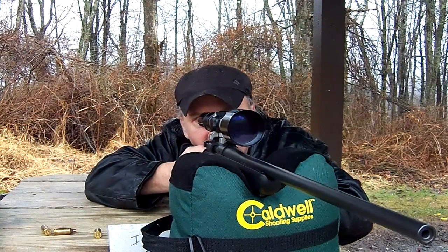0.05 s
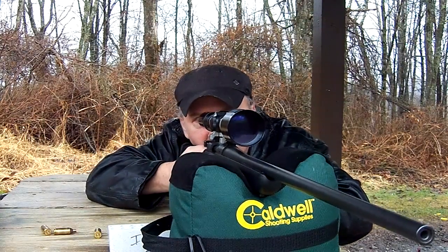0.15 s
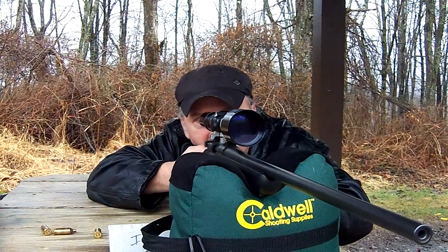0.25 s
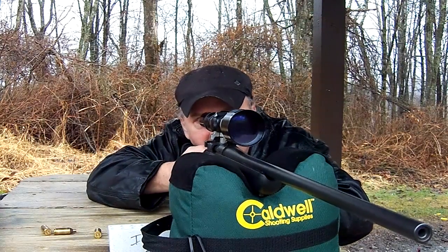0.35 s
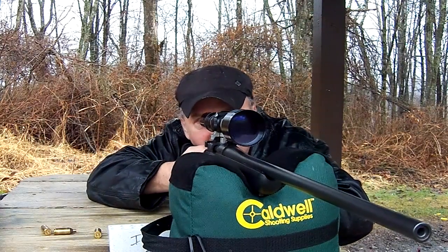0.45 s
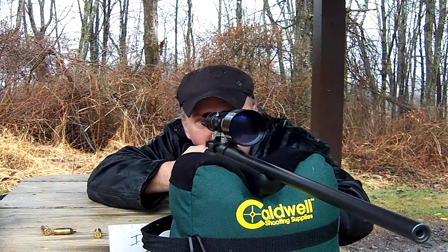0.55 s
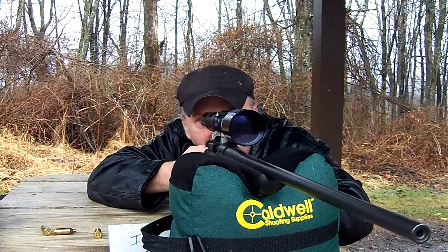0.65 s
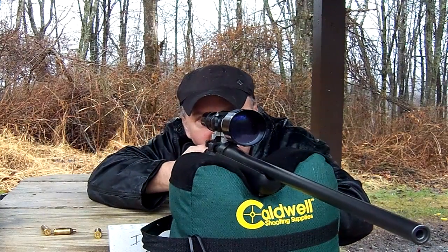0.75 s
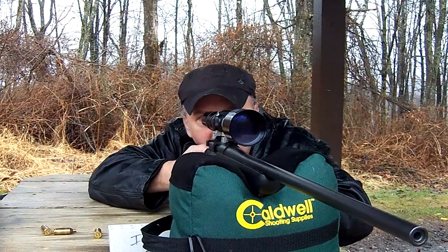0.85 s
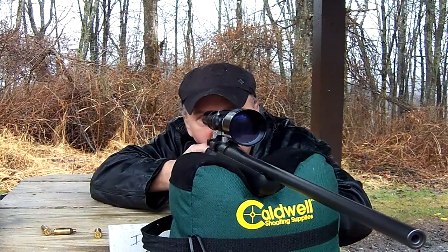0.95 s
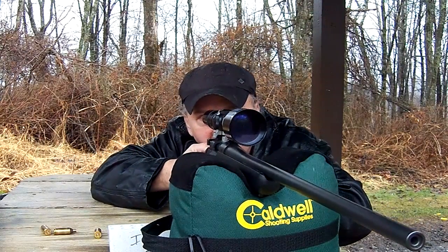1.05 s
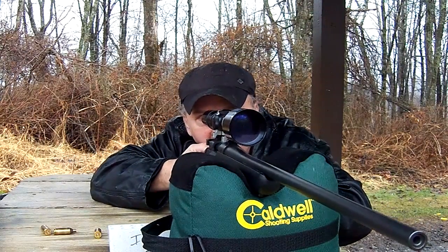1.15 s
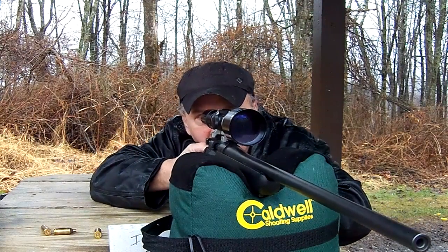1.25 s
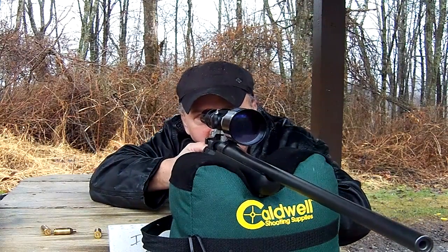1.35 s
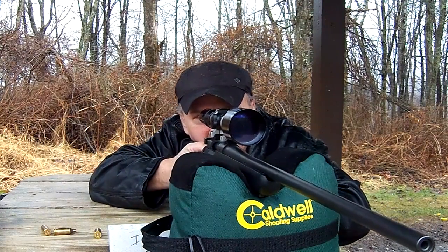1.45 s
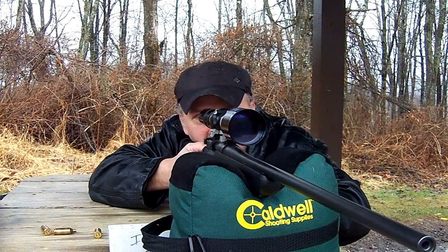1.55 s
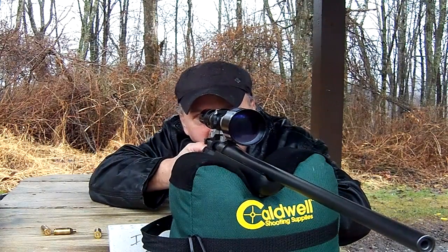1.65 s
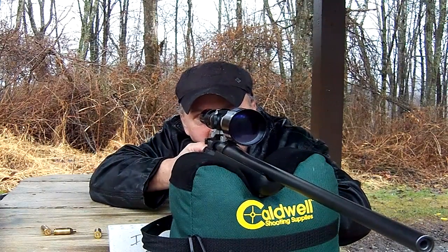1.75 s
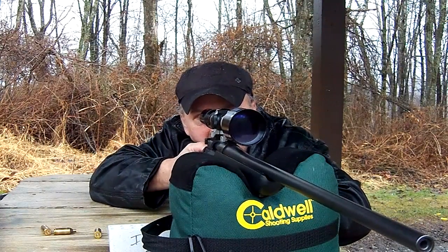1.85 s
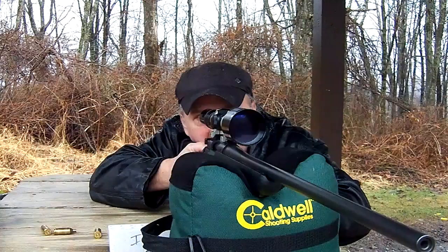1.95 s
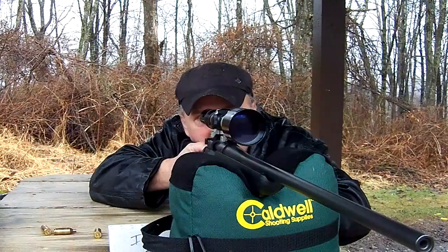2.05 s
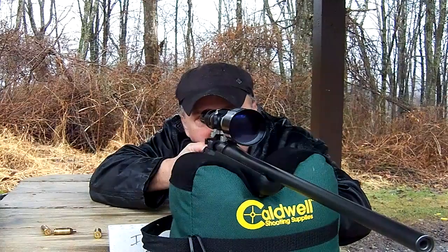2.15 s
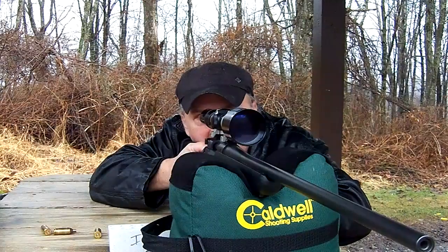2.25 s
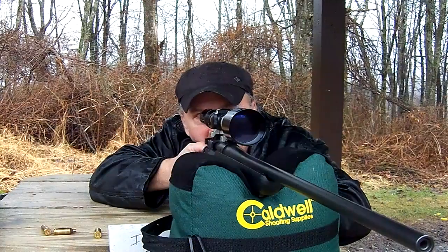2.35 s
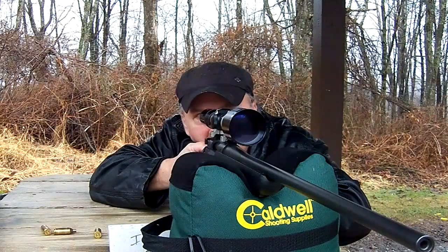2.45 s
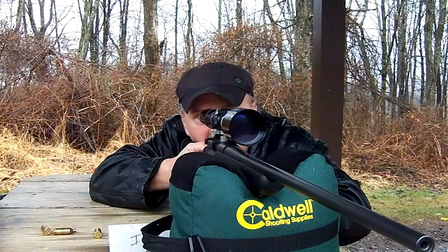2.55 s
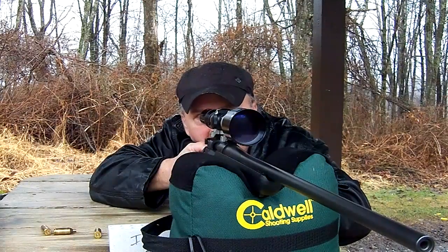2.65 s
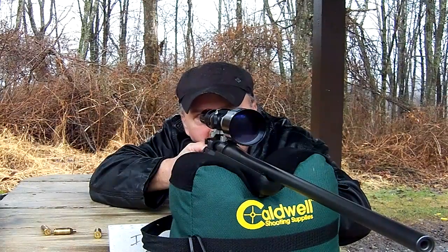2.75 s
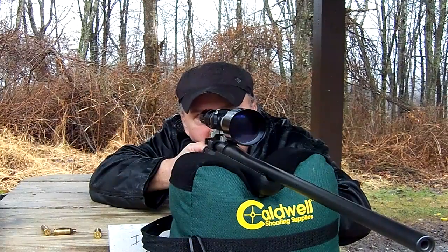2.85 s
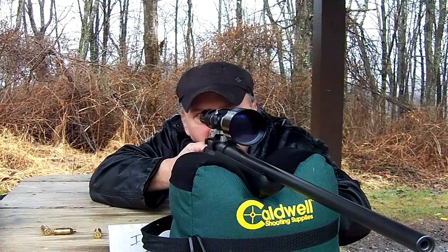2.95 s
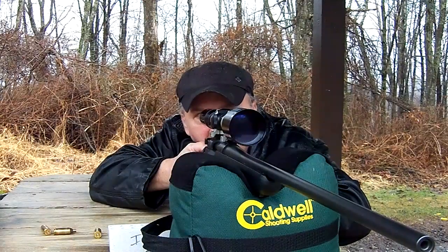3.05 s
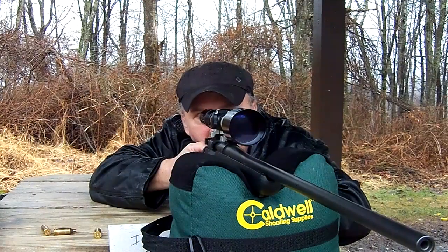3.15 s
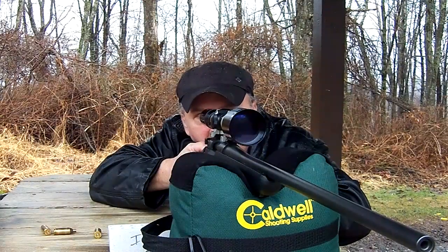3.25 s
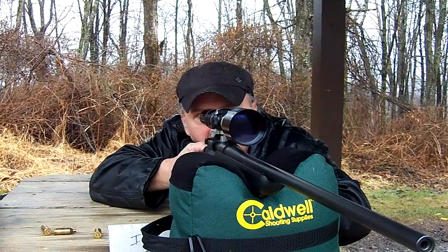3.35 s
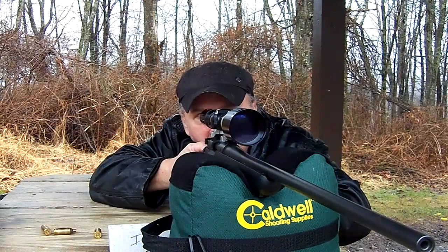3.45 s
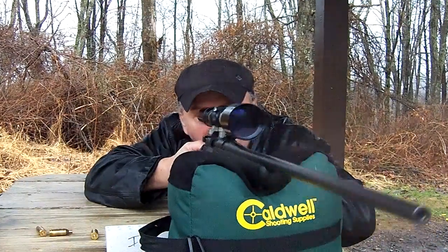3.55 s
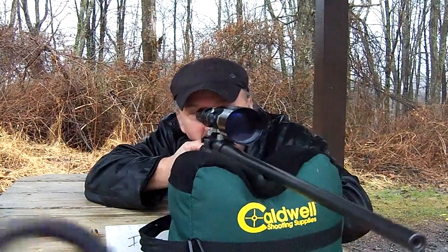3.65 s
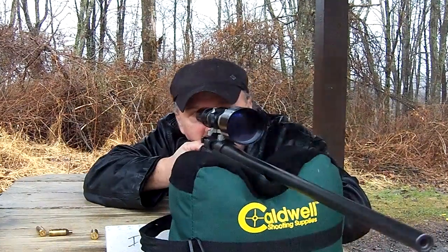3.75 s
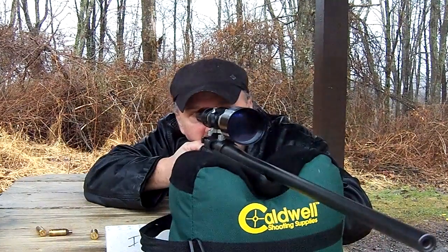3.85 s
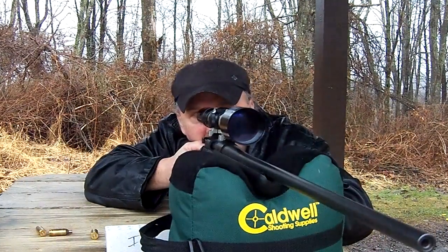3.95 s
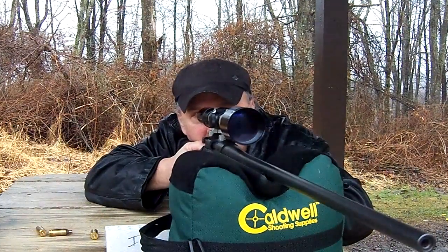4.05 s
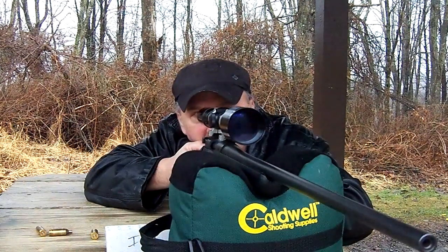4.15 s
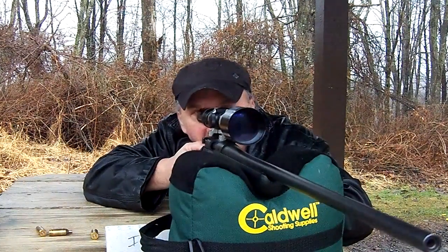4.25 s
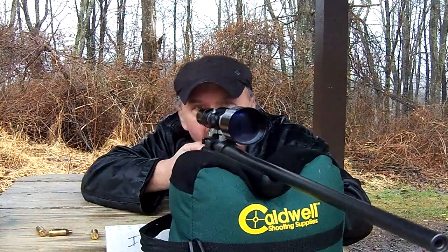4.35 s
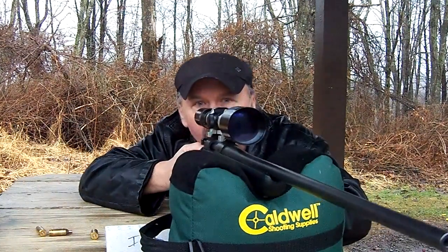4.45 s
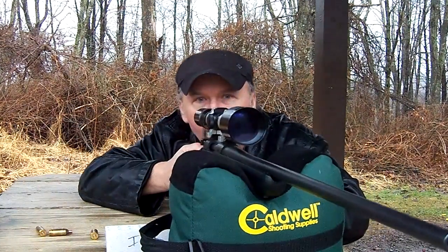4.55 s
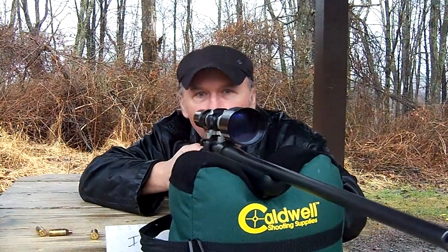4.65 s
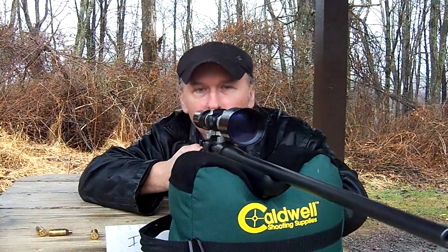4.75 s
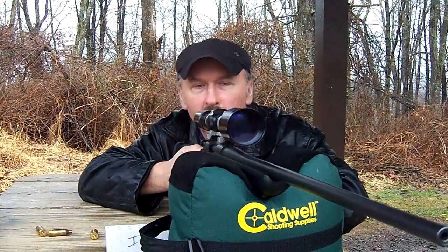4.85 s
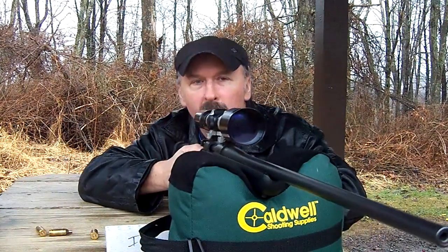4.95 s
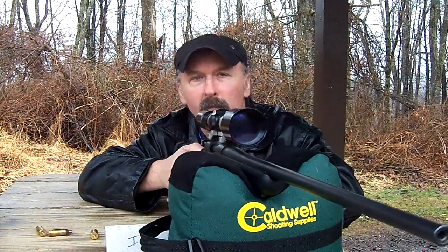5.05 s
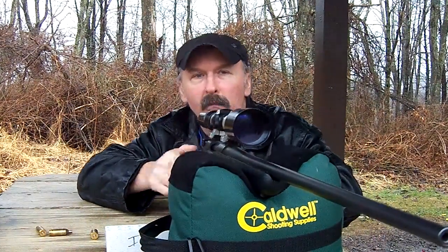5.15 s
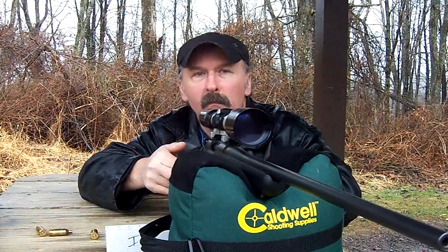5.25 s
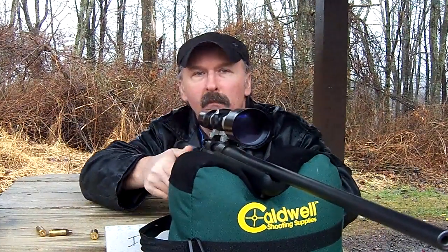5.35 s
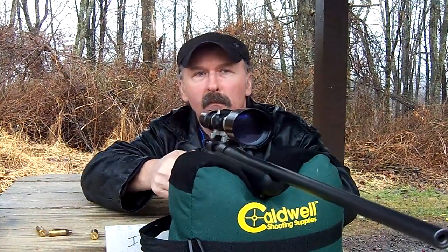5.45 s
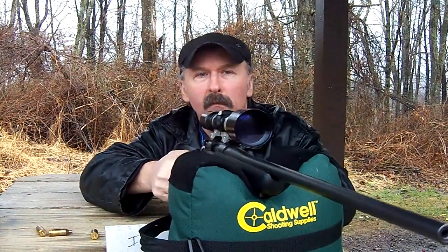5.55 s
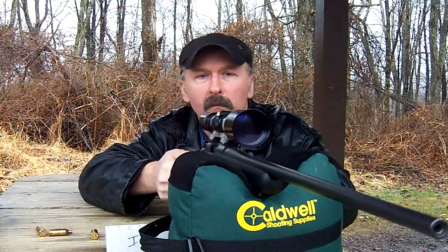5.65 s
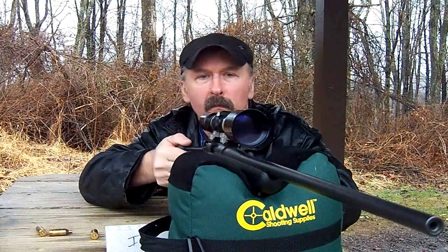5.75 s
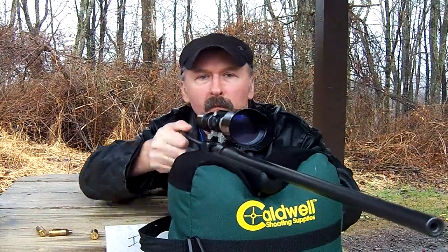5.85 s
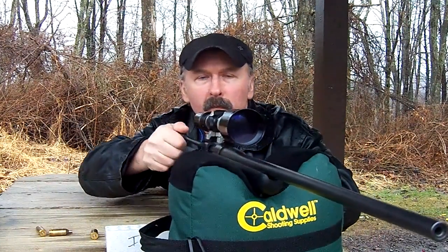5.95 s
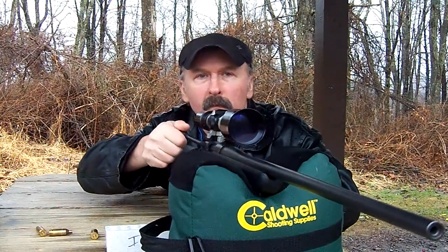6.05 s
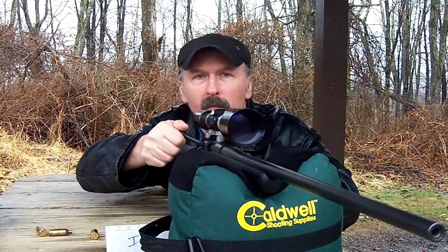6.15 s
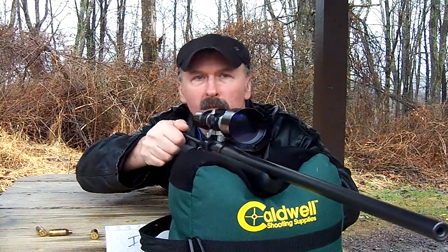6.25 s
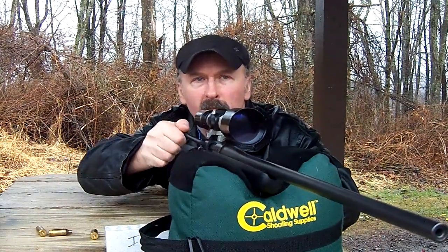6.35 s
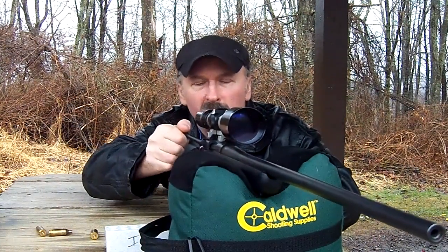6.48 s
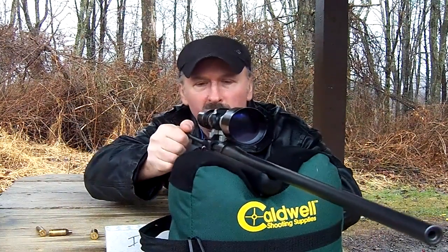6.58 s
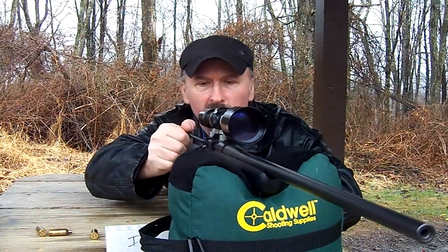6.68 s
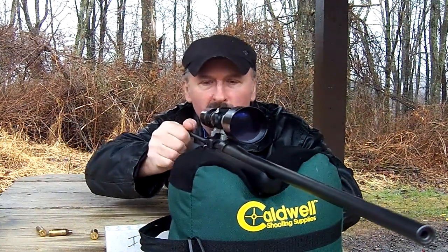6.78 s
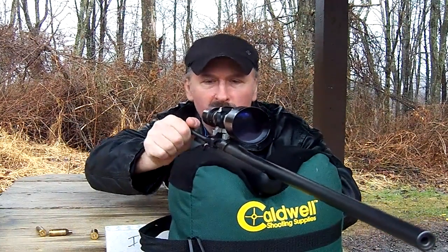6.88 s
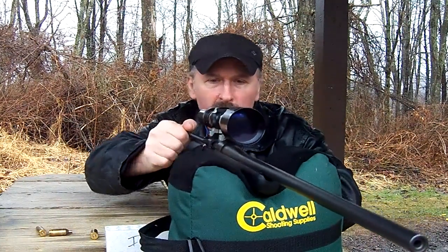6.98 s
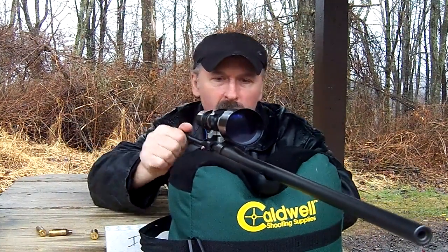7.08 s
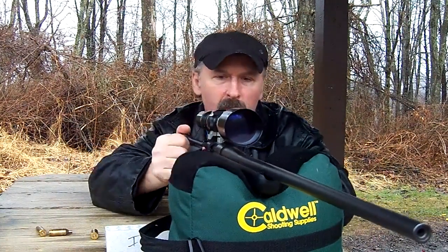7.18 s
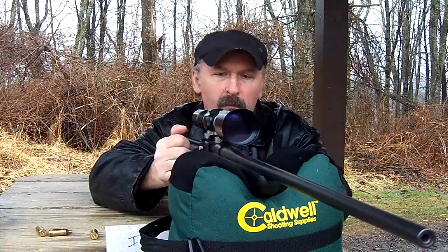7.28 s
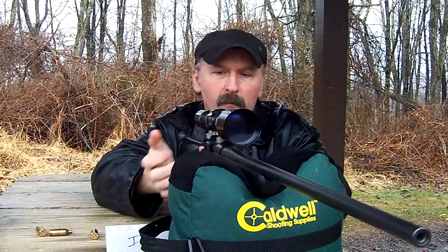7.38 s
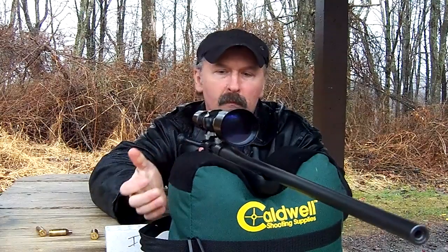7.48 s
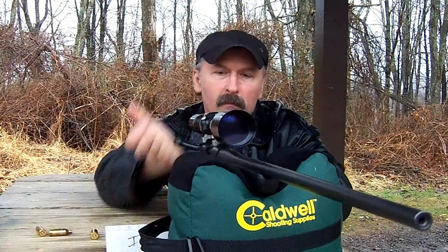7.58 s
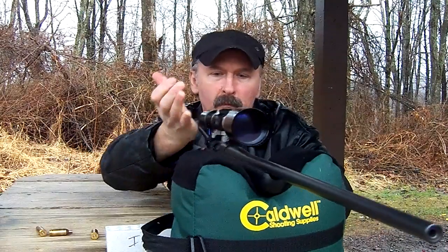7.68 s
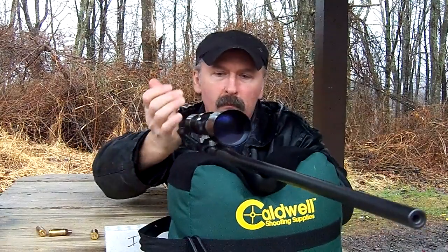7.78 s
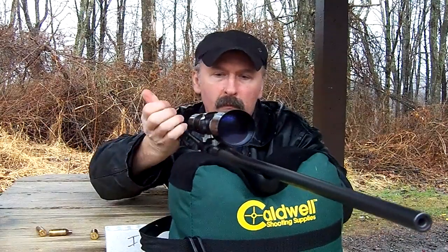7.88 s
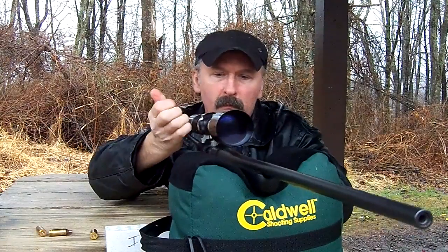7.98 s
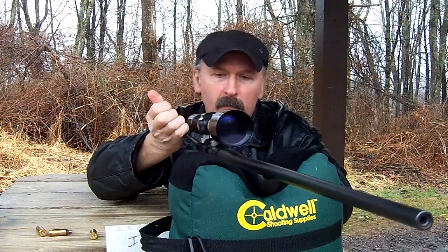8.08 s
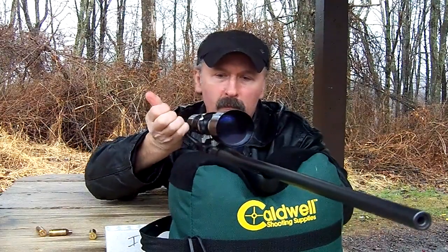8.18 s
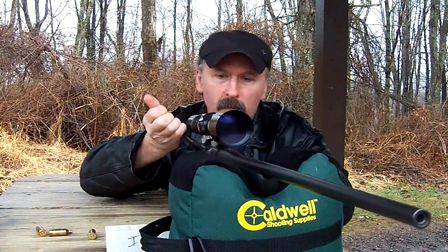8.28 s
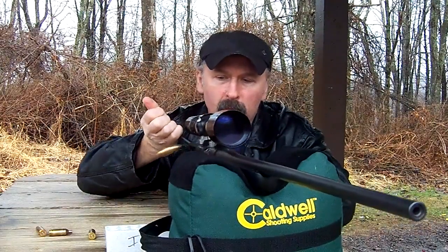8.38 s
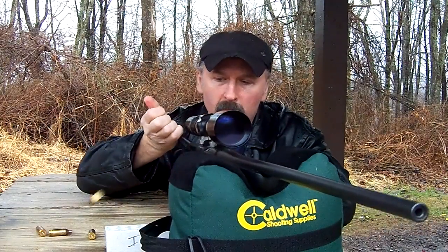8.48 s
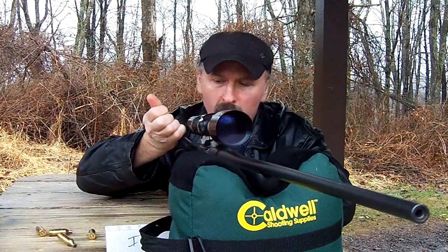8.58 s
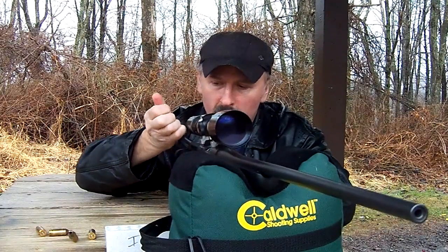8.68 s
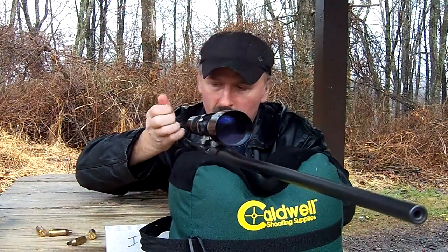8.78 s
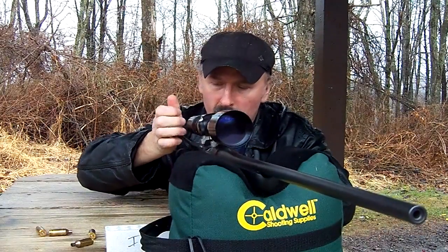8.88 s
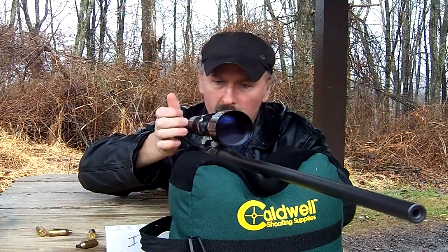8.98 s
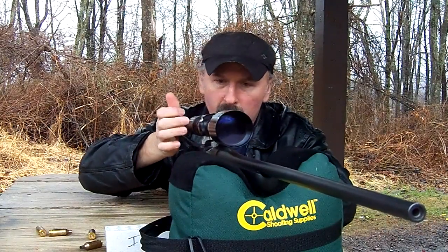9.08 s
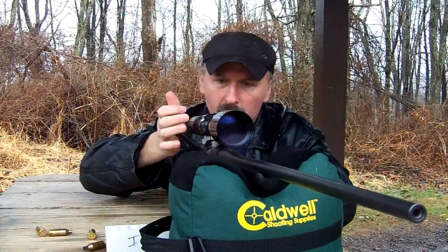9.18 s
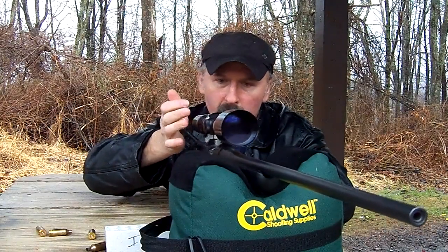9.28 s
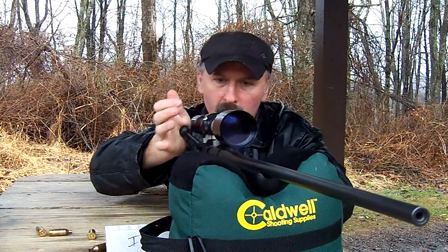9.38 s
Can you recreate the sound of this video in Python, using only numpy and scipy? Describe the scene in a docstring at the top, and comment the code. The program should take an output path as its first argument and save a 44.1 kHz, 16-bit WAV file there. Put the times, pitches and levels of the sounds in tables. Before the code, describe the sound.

After seconds of dripping wet woods, one huge rifle shot cracks and rolls away, then a bolt clatters and a spent case bounces on wood.

```python
"""A rifle shot: bands of noise fade at their own rates as crack, bark, boom and a deep push of air.
Fading noise makes the echoes from the wet woods; the microphone overloads, its gain drops and creeps back.
Then the bolt is worked (ringing steel, clatter, knocks) and the spent case bounces on a wooden table.
Water drips around the roofed bench (short rings and splashes) over a steady hiss and rumble. Mono."""
import sys
import numpy as np
from scipy import signal
from scipy.fft import rfft, irfft, next_fast_len
from scipy.io import wavfile
from scipy.ndimage import uniform_filter1d, map_coordinates

SR = 44100
rng = np.random.default_rng(int(sys.argv[2]) if len(sys.argv) > 2 else 0)


def unload_wav(signal):
    """Save mono or channel-first audio to the path in sys.argv[1] as 16-bit WAV at rate SR, clipped to [-1, 1]."""
    wavfile.write(
        sys.argv[1],
        SR,
        np.round(np.clip(np.atleast_2d(signal).T, -1, 1) * 32767).astype(np.int16),
    )


N = 415422
T = np.arange(N) / SR  # time of every sample, in seconds

# A "t60" is the time a sound takes to fade by 60 dB. Levels within a colour or mode table are relative.
# Steady outdoor background colour: (frequency [Hz], density [dB per Hz])
AIR_COLOUR = [(12, -31.5), (20, -4.5), (70, 0), (174, -9), (234, -4.5), (262, -9), (440, -15.5),
              (477, -13.5), (611, -15.5), (1180, -19), (1430, -20), (4030, -20.5), (10800, -25),
              (13800, -32)]
# Level at which the background and far patter are heard, with slow gain changes: (time [s], level [dB])
HEARD_LEVEL = [(0.6, -47.5), (3.0, -42), (7.4, -40.5), (8.0, -45.5)]
# Nearest drips on leaves and boards: (time [s], level [dB], ring [Hz])
NEAR_DRIPS = [(0.0553, -30.5, 3450), (1.3582, -32.5, 3800), (1.4857, -24.5, 3600), (1.821, -36.5, 3180),
              (2.0367, -31.5, 4400), (2.144, -35, 8600), (2.6463, -33.5, 11000), (2.8944, -33.5, 5430),
              (2.9165, -22.5, 3670), (3.1347, -34, 7230), (3.4186, -33, 8800), (3.5048, -32.5, 4460)]
# Drips into puddles: (time [s], level [dB], starting bubble pitch [Hz])
PUDDLE_PLOPS = [(0.126, -37.5, 970), (2.958, -34, 676), (3.149, -30, 807)]
# Splash colour of a near drip: (frequency [Hz], level [dB])
SPLASH_COLOUR = [(300, -14.0), (1200, -6), (3500, -2.5), (10000, -6.0), (14000, -6.0)]
# How fast sound fades under the roof: (frequency [Hz], t60 [s])
ROOF_DECAY = [(200, 0.14), (1500, 0.11), (6000, .15), (14000, 0.088)]
# Modes of the table top: (frequency [Hz], width [Hz], level [dB])
TABLE_MODES = [(222, 30, -20), (464.5, 34, -3), (560, 44, -7.5), (666, 37, -5), (873, 41, -11.5),
               (1104, 32, -12), (1288, 38, -3), (1530, 56, -5), (1725, 58, -8.5), (2250, 51, -10.5),
               (3990, 93, -28), (4315, 80, -28)]
# Woody clack of a blow on the table: (frequency [Hz], level [dB])
CLACK_COLOUR = [(100, -14), (300, 1), (500, 4.5), (1500, 3.5), (2300, -4.5), (4200, -12.5),
                (6000, -19), (14000, -42)]
# Dull taps on the bench: (time [s], level [dB])
BENCH_TAPS = [(1.481, -39), (2.914, -39), (3.053, -31.5)]
# Spent case hitting the table: (time [s], level [dB], hollow ring relative to that [dB])
CASE_BOUNCES = [(8.564, -3.3, -16), (8.644, -20, -15), (8.789, -22.5, -2), (8.819, -22, -6.5),
                (8.860, -31, -4), (8.976, -33.5, -6), (9.075, -36.5, -13)]
# Modes of the steel action: (frequency [Hz], level [dB], t60 [s])
STEEL_MODES = [(1990, -2, 0.06), (2762, -20, 0.27), (3330, -5, 0.12), (3660, -18, 0.1), (4350, -6.5, 0.098),
               (5900, -2.5, 0.15), (9055, -21, 0.13), (10100, -9, 0.11), (10500, -6, 0.099),
               (11100, -7, 0.083), (11760, -27, 0.22), (12900, -12, 0.11), (12400, -5, 0.079),
               (13540, -6.5, 0.08)]
# Dense clatter of the action: (frequency [Hz], density [dB per Hz])
CLATTER_COLOUR = [(120, -41), (400, -4.5), (650, -23), (900, -14.5), (1300, -5), (1950, -2), (2450, -2),
                  (3200, 1), (5500, 2), (8000, -0.5), (11000, 0), (13500, -7.5)]
# Knock of the rifle stock: (frequency [Hz], level [dB])
STOCK_COLOUR = [(50, -20), (130, -2.5), (400, -3.5), (900, 10.0), (1400, -12.5), (3000, -14)]
# Bright rings of a small click, the bolt lifted, the brass leaving and the bolt sliding home:
# (time [s], level [dB], frequency [Hz], t60 [s])
BRIGHT_RINGS = [(5.861, -20, 1790, 0.075), (7.632, -7, 2750, 0.09), (8.333, -18.5, 13800, 0.21),
                (9.391, -2.5, 9650, .25), (9.390, -7, 2950, 0.22)]
# The bolt is lifted, eased back, pulled to its stop and pushed home: (time of the stop [s], level [dB],
# run-up [s], first catch below the stop [dB], stock knock [dB], t60 [s], dull above [Hz])
BOLT_STROKES = [(7.6305, 1.5, .015, 43, -15.5, .106, 14000), (8.193, -19.5, .06, 26, -28, .11, 6400),
                (8.333, -6.5, .022, 17, -24, 0.096, 10800), (9.405, 0, .034, 25, -26, .14, 14000)]
# Catches in every stroke: (run-up still to go [share], level still to gain [share])
BOLT_CATCHES = [(1, 1), (.76, .55), (.37, .42)]
# Light clicks: touches of the hand on the action, the first perhaps a drip:
# (time [s], level [dB], t60 [s], dull above [Hz])
LIGHT_CLICKS = [(5.860, -17.5, .07, 4940), (6.603, -37, 0.34, 14000), (6.669, -33, .2, 9000),
                (6.979, -34, 0.1, 11000), (7.386, -34, 0.052, 12000), (7.997, -33.5, 0.054, 6960),
                (8.374, -22, 0.1, 6300), (9.281, -30, 0.059, 3960)]
# Echo colour before the air dulls it: (frequency [Hz], level [dB])
TREE_COLOUR = [(25, -9.5), (70, -7), (130, 9.5), (330, 8.5), (550, 6), (1000, 4.5), (1700, 4), (4000, 2),
               (14000, 0)]
# Colour of the roll from far slopes: (frequency [Hz], level [dB])
SLOPE_COLOUR = [(25, -17.5), (70, -6), (100, -10), (150, 1), (210, 0), (330, -1.5), (450, -19),
                (1000, -42.5), (3000, -80)]
# Near trunks, tree line and deep woods answer in turn:
# (delay after the shot [s], level [dB], swell [dB per s], fade [dB per s])
WOOD_ECHOES = [(.025, 15, 1001, 124.5), (.32, 1, 25, 45), (1.2, -10.5, 2.5, 10)]
# Low rolls sent back by far slopes: (delay after the shot [s], level [dB])
SLOPE_ROLLS = [(.62, -26.5), (1.13, -24), (1.37, -21.5), (1.75, -25.5), (2.179, -30.5)]
# Boom of the bench and roof: (frequency [Hz], level [dB])
BOOM_COLOUR = [(30, -17.5), (80, -15.5), (125, 3), (190, -5.0), (350, 1.5), (560, -2.5),
               (1000, -15), (4000, -44.5)]

SHOT_S = 3.5505
BREEZE_S, BREEZE_DB, BREEZE_SWELL_DB_S, BREEZE_FADE_DB_S = 6.2, -37.5, 17.5, 40  # one soft gust
ROLL_SWELL_DB_S, ROLL_FADE_DB_S = 64.5, 16  # how fast a roll builds and dies
CATCH_T60_S = 0.1
CLICK_KNOCK_DB = -31
KNOCK_SLOPE = 0.41  # the softer a contact, the more wood and the less steel is heard (dB per dB)
TOP_HZ = 14050  # the treble of the finished sound ends around here


def amp(db):
    """Turn decibels into a gain."""
    return 10 ** (np.asarray(db) / 20)


def unit(x):
    """Scale a sound to an rms (average strength) of 1."""
    return x / np.sqrt(np.mean(x ** 2) + 1e-20)


def along(points, hz):
    """Read between (frequency, value) points on a log frequency axis."""
    f, v = np.transpose(points)
    return np.interp(np.log(hz + 1), np.log(f + 1), v)


def curve(rows):
    """Join (time, value) rows into one value per sample."""
    return np.interp(T, *np.transpose(rows))


def filtered(x, response):
    """Multiply the spectrum of x by a response that depends on frequency."""
    size = next_fast_len(len(x) + 8192)
    hz = np.fft.rfftfreq(size, 1 / SR)
    return irfft(rfft(x, size) * response(hz), size)[:len(x)]


def noise(spectrum, size=N):
    """Make noise of rms 1 with the colour in a table."""
    white = rng.standard_normal(size)
    return unit(filtered(white, lambda hz: amp(along(spectrum, hz))))


def resonance(f, centre, width):
    """Response of one damped vibration: strongest at its centre, broader with more damping."""
    return 1j * f * width / (centre ** 2 - f ** 2 + 1j * f * width)


def band(centre_hz, width_hz, size=N):
    """Make noise of rms 1 through one resonance."""
    white = rng.standard_normal(size)
    return unit(filtered(white, lambda f: resonance(f, centre_hz, width_hz)))


def fading(gain_db, size=N):
    """Shape white noise with a gain that depends on frequency and time."""
    hz, t, z = signal.stft(rng.standard_normal(size), SR, nperseg=512)
    shaped = z * amp(gain_db(hz[:, None], t))
    return signal.istft(shaped, SR, nperseg=512)[1][:size]


def decay(t, t60, attack):
    """Loudness shape of a blow at t = 0: a quick rise, then a steady fade in dB."""
    t = np.maximum(t, 0)
    fade = np.exp(-np.log(1000) * t / t60)
    return fade * (1 - np.exp(-t / attack))


def swell(peak_s, level_db, rise_db_s, fall_db_s):
    """Gain of a sound that builds to its peak and dies away, each at a steady rate."""
    return amp(level_db - np.maximum(rise_db_s * (peak_s - T), fall_db_s * (T - peak_s)))


def wobble(rate):
    """A smooth random curve with this many random points a second."""
    return map_coordinates(rng.standard_normal(N // 100), [T * rate], mode="wrap")


def uneven(x, depth_db, spacing_hz):
    """Make the spectrum bumpy at random, as every contact point favours other resonances."""
    knots = rng.standard_normal(400)
    places = np.arange(len(knots))
    return unit(filtered(x, lambda hz: amp(depth_db * np.interp(hz / spacing_hz, places, knots))))


def add(track, s, sound):
    """Mix a sound into the track, starting at time s."""
    part = track[max(round(s * SR), 0):][:len(sound)]
    part += sound[:len(part)]


def sheltered(x, wet_db):
    """Add the short tail of a near sound under the roof, fading at a rate set by frequency."""
    tail = fading(lambda hz, t: -60 * t / along(ROOF_DECAY, hz), size=SR // 3)
    tail = tail / np.linalg.norm(tail)
    return x + amp(wet_db) * signal.fftconvolve(x, tail)[:N]


def background():
    """A distant rumble and the hiss of wet undergrowth; a breeze swells in the bass as the echo fades."""
    air = amp(curve(HEARD_LEVEL)) * noise(AIR_COLOUR)
    breeze = swell(BREEZE_S, BREEZE_DB, BREEZE_SWELL_DB_S, BREEZE_FADE_DB_S) * band(38, 35)
    return air + breeze


def drip(hz, ring_t60=0.059, splash_db=-2.5):
    """A drop lands softly with a short splash and a fuzzy ring."""
    t = T[:SR // 10]
    rise = 0.005  # s
    ring = band(hz, hz * 0.21, len(t)) * decay(t, ring_t60, rise)
    splash = uneven(noise(SPLASH_COLOUR, len(t)), depth_db=1.5, spacing_hz=590)
    return ring + amp(splash_db) * splash * decay(t, 0.07, rise)


def plop(hz):
    """A drop into a puddle makes a bubble whose pitch climbs, blurred by noise near its starting pitch."""
    t = T[:SR // 12]
    tone = np.sin(2 * np.pi * hz * t * (1 + 0.54 * t))
    bubble = tone + 0.42 * band(hz, 300, len(t))
    return bubble * decay(t, 0.059, 0.0024)


def far_drip(pitch):
    """A far drop: a high tone blurred by slow noise, with a bright splash."""
    t = T[:SR // 12]
    fuzz = unit(uniform_filter1d(rng.standard_normal(len(t)), size=60))
    ring = fuzz * np.sin(2 * np.pi * 2800 * 4.2 ** pitch * t)  # from 2800 Hz up to 4.2 times that
    splash = 0.4 * np.diff(rng.standard_normal(len(t) + 1))  # differences favour treble
    return (ring + splash) * decay(t, 0.058, 0.0046)


def dripping(count=300):
    """Near drips and plops over a random patter of far ones, all with the short tail under the roof."""
    near, far = np.zeros(N), np.zeros(N)
    for s, db, hz in NEAR_DRIPS:
        add(near, s, amp(db) * drip(hz))
    for s, db, hz in PUDDLE_PLOPS:
        add(near, s, amp(db) * plop(hz))
    for when, size, pitch in rng.random((count, 3)):
        add(far, when * N / SR, amp(11 * size ** 3) * far_drip(pitch))  # loud ones are rare
    return sheltered(near + far * amp(curve(HEARD_LEVEL)), wet_db=-4.5)


def table_knock():
    """One blow on the boards: their modes ring under a dense woody clack."""
    t = T[:SR // 5]

    def boards(f):
        """Sum the modes, with alternating sign and slightly random strength."""
        total = 0
        for k, (hz, width, db) in enumerate(TABLE_MODES):
            total = total + (-1) ** k * amp(db + rng.normal(0, 1)) * resonance(f, hz, width)
        return total

    knock = unit(filtered(signal.unit_impulse(len(t)), boards))
    clack = noise(CLACK_COLOUR, len(t)) * decay(t, 0.047, 0.00045)
    return amp(-21.5) * knock + amp(-9.5) * clack


def hollow_case():
    """The hollow case rings as three bands of noise that fade together."""
    t = T[:SR // 5]
    ring = band(1220, 250, len(t)) + band(1770, 250, len(t)) + band(2350, 300, len(t))
    return unit(ring) * decay(t, 0.051, 0.00081)


def bench():
    """A few dull taps before the shot; later the case strikes the boards and bounces more and more lightly."""
    out = np.zeros(N)
    for s, db in BENCH_TAPS:
        add(out, s, amp(db) * table_knock())
    for s, db, ring_db in CASE_BOUNCES:
        add(out, s, amp(db) * (table_knock() + amp(ring_db) * hollow_case()))
    return sheltered(out, wet_db=-4)


def contact(db, knock_db, t60, dull_hz):
    """One contact rattles the action, rings its modes at new strengths and knocks the stock."""
    t = T[:SR // 3]
    ring = np.zeros(len(t))
    for hz, level, life in STEEL_MODES:
        strength, phase = rng.standard_normal(2)
        tone = np.sin(2 * np.pi * hz * t + np.pi * phase)
        ring += amp(level + 2.1 * strength) * tone * decay(t, life, 0.0005)
    clatter = uneven(noise(CLATTER_COLOUR, len(t)), depth_db=3, spacing_hz=110)
    knock = amp(knock_db - KNOCK_SLOPE * db) * noise(STOCK_COLOUR, len(t))
    snap = 1 + 0.89 * decay(t, 0.02, 0.0001)  # the first instant of contact stands out
    hit = (clatter + knock) * snap * decay(t, t60, 0.00074) + amp(-15.5) * ring
    return amp(db) * filtered(hit, lambda hz: 1 / np.sqrt(1 + (hz / dull_hz) ** 4))


def bolt():
    """In every stroke the bolt catches ever harder until it meets its stop; light clicks come around them."""
    out, t = np.zeros(N), T[:SR // 3]
    for s, db, run_up_s, below_db, knock_db, t60, dull_hz in BOLT_STROKES:
        for to_go, to_gain in BOLT_CATCHES:
            catch = contact(db - to_gain * below_db, knock_db, CATCH_T60_S, dull_hz)
            add(out, s - to_go * run_up_s, catch)
        add(out, s, contact(db, knock_db, t60, dull_hz))
    for s, db, t60, dull_hz in LIGHT_CLICKS:
        add(out, s, contact(db, CLICK_KNOCK_DB, t60, dull_hz))
    for s, db, hz, t60 in BRIGHT_RINGS:
        add(out, s, amp(db) * band(hz, 110, len(t)) * decay(t, t60, 0.0018))
    return sheltered(out, wet_db=-13)


def woods():
    """Countless trunks scatter the shot; the longer the path, the more treble the air has taken."""
    def scatter_db(hz, t):
        """Tree colour, less what the air takes for every second of travel."""
        air_loss_db_s = 1.71 * (hz / 1000) ** 1.506
        return along(TREE_COLOUR, hz) - air_loss_db_s * np.maximum(t - SHOT_S, 0)

    echoes = [swell(SHOT_S + delay, db, rise, fall) for delay, db, rise, fall in WOOD_ECHOES]
    rolls = [swell(SHOT_S + delay, db, ROLL_SWELL_DB_S, ROLL_FADE_DB_S) for delay, db in SLOPE_ROLLS]
    clumps_db = 0.6 * wobble(60)  # stands of trees answer in clumps
    surges_db = 1.8 * wobble(14)  # the roll comes in surges
    # the norm adds the overlapping answers as power
    echo = np.linalg.norm(echoes, axis=0) * amp(clumps_db) * fading(scatter_db)
    roll = np.linalg.norm(rolls, axis=0) * amp(surges_db) * noise(SLOPE_COLOUR)
    return (T > SHOT_S) * (echo + roll)


def shot():
    """A bright crack, the bark of the muzzle blast, the boom of the bench and roof, and a deep push of air."""
    age = T - SHOT_S
    crack = amp(2.5) * band(7500, 3600) * decay(age, 0.17, 0.003)
    bark = amp(20.5) * band(1800, 1500) * decay(age - 0.013, 0.19, 0.0053)
    boom = amp(20.5) * noise(BOOM_COLOUR) * decay(age - 0.032, 0.22, 0.003)
    push = amp(2.0) * band(37, 25) * decay(age - 0.015, 0.36, 0.02)
    return crack + bark + boom + push


def scene():
    """Everything reaches a single microphone, copied to both channels."""
    mono = background() + dripping() + bench() + bolt() + woods() + shot()
    return np.array([mono, mono])


def gain_control(x, threshold_db=-38, attack_db_s=17, depth_db=18, hold_s=0.65, release_db_s=11, size=220):
    """The gain slides down while the output is loud, waits, then creeps back up."""
    power = np.abs(uniform_filter1d(x ** 2, 4 * size))[::size]
    step = size / SR  # seconds between decisions
    cut, quiet, cuts = 0, 0, []  # cut in dB, quiet in seconds
    for level in 10 * np.log10(power + 1e-12):
        quiet += step
        if level - cut > threshold_db:
            cut = min(cut + attack_db_s * step, depth_db)
            quiet = 0
        elif quiet > hold_s:
            cut = max(cut - release_db_s * step, 0)
        cuts.append(cut)
    return amp(-np.interp(T, T[::size], cuts))


def record(dry, ceiling=0.72, hardness=4.0):
    """The microphone stage clips, gain control follows, and last of all the treble is cut off steeply."""
    clipped = dry[0] / (1 + np.abs(dry[0] / ceiling) ** hardness) ** (1 / hardness)
    levelled = clipped * gain_control(clipped)
    x = filtered(levelled, lambda hz: np.clip((TOP_HZ - hz) / 400 + 0.5, 0, 1))
    return np.array([x, x])


dry = scene()
out = record(dry)
unload_wav(out)
```